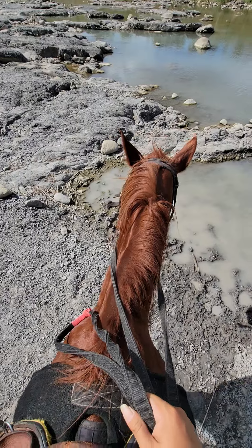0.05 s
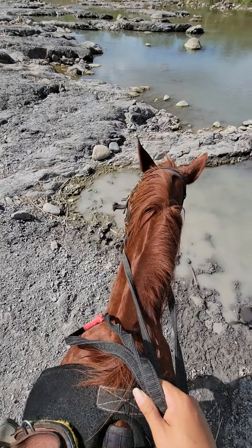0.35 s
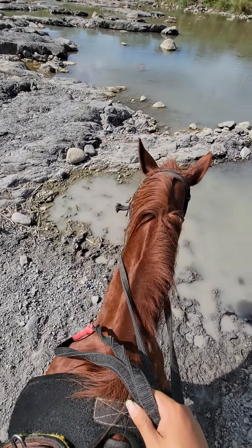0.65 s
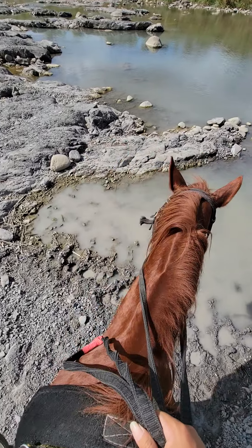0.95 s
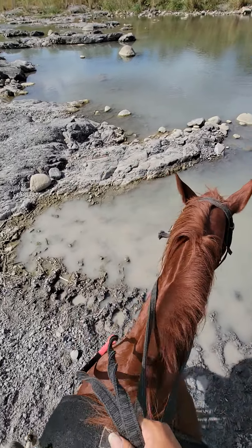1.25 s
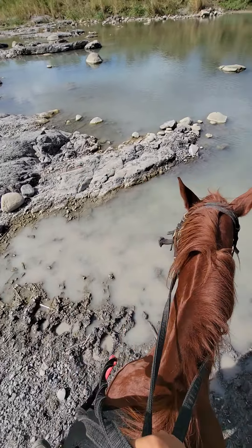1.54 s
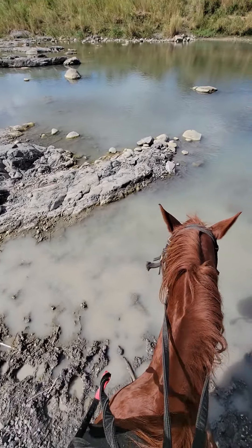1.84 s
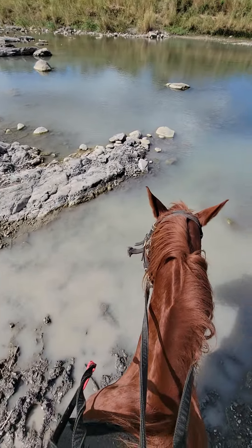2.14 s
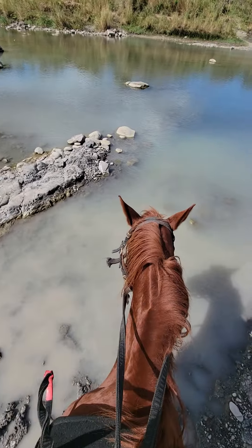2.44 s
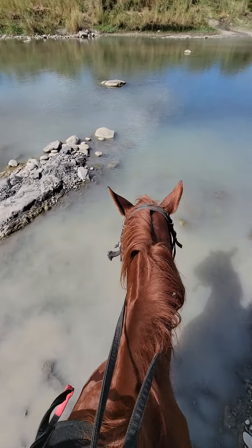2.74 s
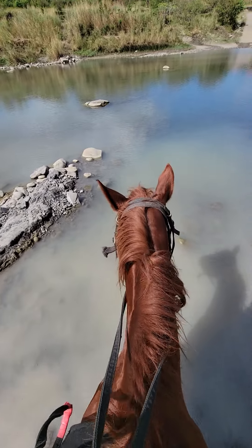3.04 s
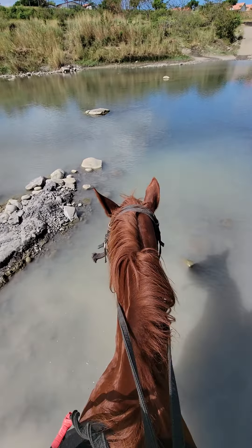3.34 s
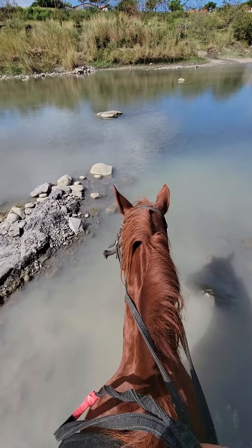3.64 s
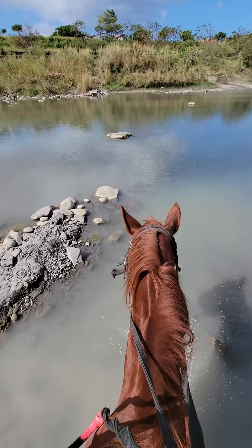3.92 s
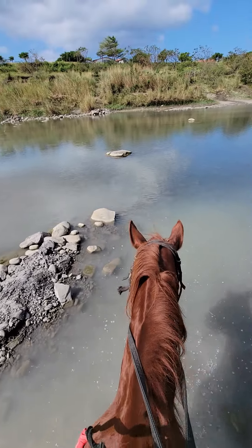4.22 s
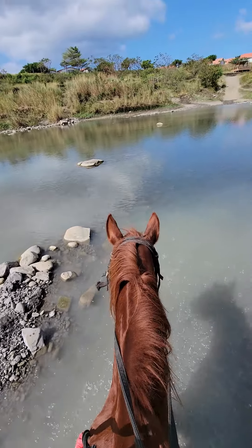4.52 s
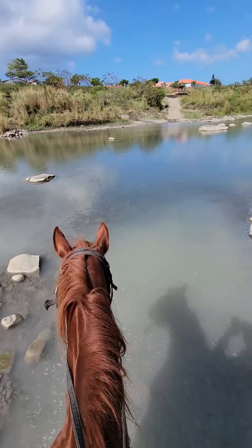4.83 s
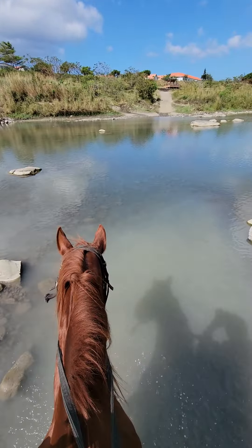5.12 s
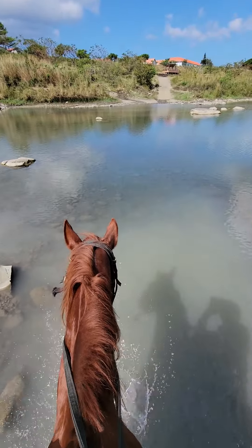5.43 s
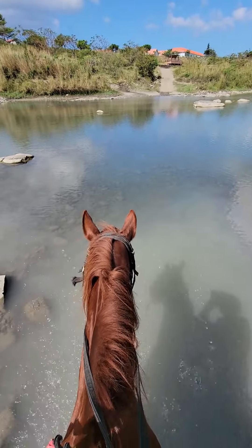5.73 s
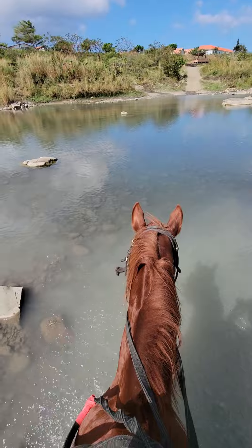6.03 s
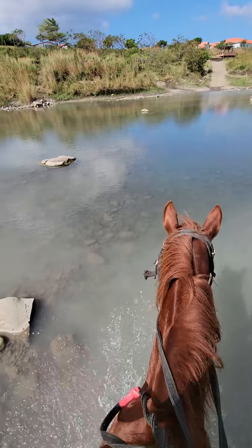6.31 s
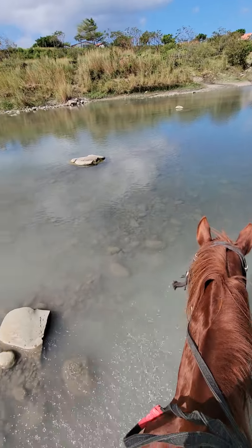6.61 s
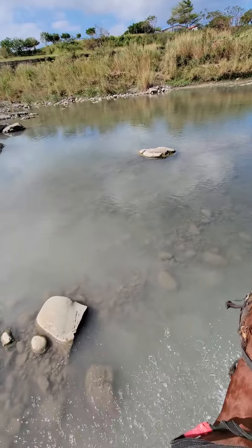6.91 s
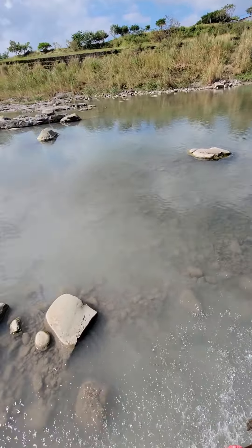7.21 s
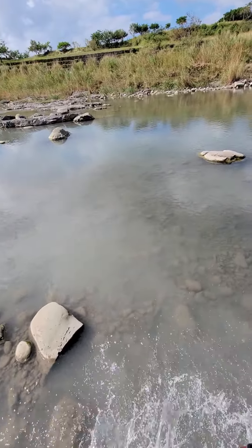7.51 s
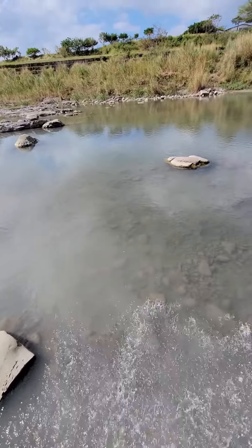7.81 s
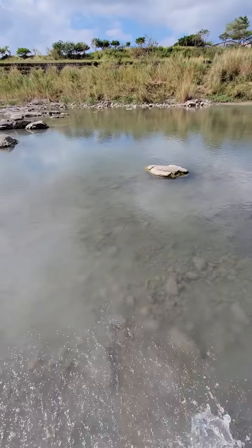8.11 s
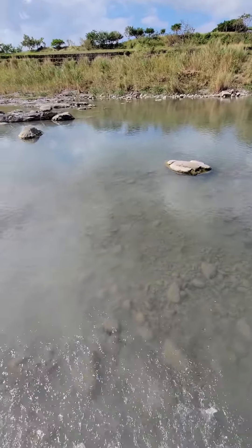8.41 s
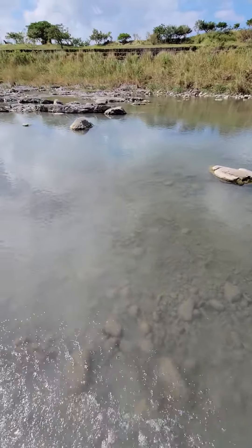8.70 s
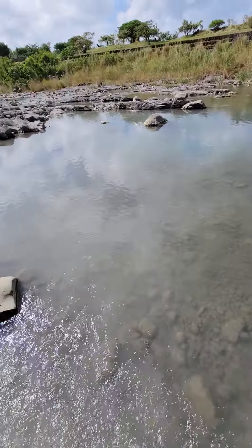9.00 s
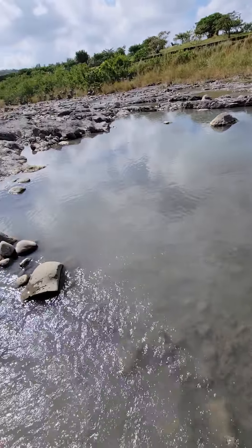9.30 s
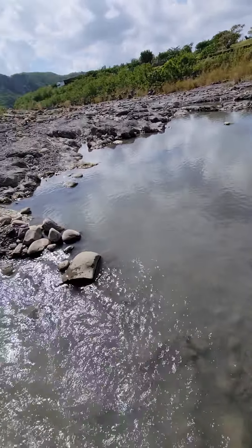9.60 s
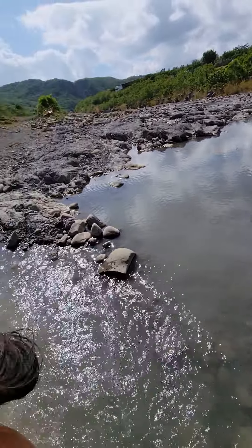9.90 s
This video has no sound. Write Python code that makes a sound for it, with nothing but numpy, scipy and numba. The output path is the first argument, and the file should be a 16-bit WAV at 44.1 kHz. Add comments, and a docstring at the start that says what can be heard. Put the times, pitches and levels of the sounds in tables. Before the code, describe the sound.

A horse steps over gravel and stones, then wades through a shallow river with repeated splashes and sloshing, as birds chirp faintly.

```python
"""A horse wades into a shallow river from a gravel bank, heard from a phone in the saddle.
Each hoof punches an air pocket that collapses into ringing bubbles; the legs churn the water and throw
spray that rains back. Every bubble is a damped resonator: the smaller it is, the higher its pitch.
Songbirds call from the far bank over faint insects, a low distant drone and a little wind."""
import sys
import numpy as np
from scipy import signal
from scipy.fft import rfft, irfft, next_fast_len
from scipy.io import wavfile
from scipy.ndimage import uniform_filter1d, map_coordinates
from numba import njit

SR = 44100
rng = np.random.default_rng(int(sys.argv[2]) if len(sys.argv) > 2 else 0)


def to_wav(s):
    """Save 16-bit WAV."""
    ch = np.atleast_2d(s).T  # columns
    pcm = np.round(np.clip(ch, -1, 1) * 32767)  # PCM
    wavfile.write(sys.argv[1], SR, pcm.astype(np.int16))


N = 438794
T = np.arange(N) / SR


def undb(db):
    """Decibels to amplitude gain."""
    return 10 ** (np.asarray(db) / 20)


def curve(rows, column=1):
    """Linear interpolation of one column of a time table, at every sample."""
    rows = np.array(rows)
    return np.interp(T, rows[:, 0], rows[:, column])


def colour(x, points, delayed=False):
    """Spectral shaping by (Hz, dB) points; if delayed, a third column gives the lag in ms."""
    size = next_fast_len(x.shape[-1] + 512)
    hz, points = np.fft.rfftfreq(size, 1 / SR), np.array(points)
    read = lambda column: np.interp(np.log(hz + 1), np.log(points[:, 0]), points[:, column])
    gain = undb(read(1))
    if delayed:
        gain = gain * np.exp(-2j * np.pi * hz * read(2) / 1000)
    return irfft(rfft(x, size) * gain, size)[..., :x.shape[-1]]


def unit(x):
    """Normalisation to rms 1."""
    return x / np.sqrt(np.mean(x ** 2))


def walk(rate_hz):
    """Smooth random modulation with a spread near 1."""
    knots = rng.standard_normal(4096)
    return np.interp(T * rate_hz, np.arange(len(knots)), knots)


def add(out, s, x, db):
    """Superposition: mix in a short sound at time s with the given peak level."""
    i = int(s * SR)
    out[:, i:i + x.shape[1]] += x[:, :N - i] * undb(db) / np.abs(x).max()


def swells(bed_db, rows, rise_share=.34, roundness=2.2):
    """Incoherent sources add in power: the level in dB of a bed plus swells (peak s, length s, dB)."""
    t = T[::64]
    power = undb(bed_db + 0 * T)[::64] ** 2
    for s, length_s, db in rows:
        away = np.maximum((s - t) / rise_share, (t - s) / (1 - rise_share)) / length_s
        power = power + undb(db - 10 * np.minimum(away, 10) ** roundness) ** 2  # ends 10 dB down
    return np.interp(T, t, 10 * np.log10(power))


def diffuse_noise(shared_hz):
    """In a diffuse field the phone's two ports share long waves and differ in short ones."""
    mid, side = rng.standard_normal((2, N))
    side = signal.sosfilt(signal.butter(2, shared_hz, "high", fs=SR, output="sos"), side)
    return np.array([mid + side, mid - side])


@njit
def ring(start, hz, t60, peak, glide, lag, size):
    """Damped oscillators that can glide upward, each with its own lag between the ports."""
    out = np.zeros((2, size))
    for k in range(len(start)):
        for side in range(2):
            onset = max(start[k] + (side - .5) * lag[k], 0.)
            for i in range(int(onset * SR) + 1, min(int((onset + t60[k]) * SR), size)):
                age = i / SR - onset
                phase = 2 * np.pi * hz[k] * age * (1 + .35 * glide[k] * age)
                out[side, i] += peak[k] * np.exp(-6.9 * age / t60[k]) * np.sin(phase)
    return out


def grains(count, low_hz, high_hz, cycles, spread_db, lag_s, rise=.97):
    """Shot noise of ringing grains; by a power law, a few are much larger than the rest."""
    when, pitch, rank, life, place = rng.random((count, 5)).T
    hz = low_hz * (high_hz / low_hz) ** pitch
    t60 = cycles * (.4 + 1.2 * life) / hz
    peak = undb(-spread_db * np.log(rank + .01)) * hz * (-1) ** np.arange(count)
    return unit(ring(when * N / SR, hz, t60, peak, rise / t60, lag_s * (2 * place - 1), N))


def burst(count, hz, octaves, cycles, fade_s, lag_s=8e-5):
    """A transient of ringing grains around one pitch, dying away over four times fade_s."""
    pitch, strength, polarity = rng.standard_normal((count, 3)).T
    age = np.arange(count) / count
    hz = np.minimum(hz * 2 ** (octaves * pitch), SR / 2)
    start = 4 * fade_s * (age + rng.random(count) * (age > 0) / count)
    peak = np.exp(-3.5 * age) * undb(5.26 * strength) * np.sign(polarity)
    return ring(start, hz, cycles / hz, peak, 0 * hz, lag_s * rng.standard_normal(count), SR // 5)


# Spectrum of the open air. Each row: frequency in Hz, gain in dB.
AIR_SPECTRUM = [(25, -17), (55, -4), (110, 13), (170, 2), (350, -2.5), (900, -6.5), (2000, -14),
                (3000, -10.5), (4500, -20.5), (8000, -31.5), (11000, -45.5), (16000, -35)]
def open_air(air_db=-50, drone_hz=84, drone_db=-48):
    """Diffuse ambient noise and a distant drone that wavers by random modulation."""
    air = unit(colour(diffuse_noise(260), AIR_SPECTRUM)) * undb(air_db + walk(4.25) + 2.08 * walk(6))
    drone = np.sin(2 * np.pi * np.cumsum(drone_hz + 2.675 * walk(4.6)) / SR)
    return air + unit(drone) * undb(drone_db + 2 * walk(20))


# Wind on the phone. Each row: time in seconds, level in dB.
WIND_LEVELS = [(0, -42), (.3, -40.5), (.39, -29), (.48, -36.5), (.8, -48), (1.3, -54.5), (6, -63),
               (9.95, -55.5)]
def wind():
    """Turbulence buffets the phone with low-frequency pressure fluctuations."""
    spectrum = [(15, -22), (35, 1.5), (70, 2.5), (120, -11), (250, -29), (1000, -36.5), (4000, -91)]
    return unit(colour(diffuse_noise(33), spectrum)) * undb(curve(WIND_LEVELS) + 2 * walk(25))


# Insect buzzes. Each row: start in seconds, length in seconds, pitch in Hz, level in dB.
INSECT_BUZZES = [(0.054, 0.16, 10900, -64), (1.57, 0.13, 10500, -67), (1.724, 0.11, 10500, -61)]
def insects():
    """Random frequency modulation roughens a very high tone into a thin buzz."""
    out = np.zeros((2, N))
    for s, length_s, hz, db in INSECT_BUZZES:
        size = int(length_s * SR)
        wander = uniform_filter1d(rng.standard_normal((2, size)), 40, axis=1)
        phase = 2 * np.pi * np.cumsum(hz + 1800 * wander, axis=1) / SR
        add(out, s, np.sin(phase) * np.hanning(size), db)
    return out


def chirp(length_s, hz, fall_octaves, fall_s=.058, burr_hz=420, burr_octaves=.075, break_hz=150):
    """A falling whistle, made ragged by fast frequency and amplitude modulation."""
    age = T[:int(length_s * SR)]
    flutter = np.interp(age * burr_hz, np.arange(256), rng.standard_normal(256))
    breaks = np.interp(age * break_hz, np.arange(256), rng.standard_normal(256))
    pitch = hz * 2 ** (burr_octaves * flutter - fall_octaves * np.tanh((age / fall_s) ** 2))
    envelope = np.hanning(len(age)) ** .5 * (1 + np.tanh(breaks))
    return np.sin(2 * np.pi * np.cumsum(pitch) / SR)[None] * envelope


def chorus(count, hz, db):
    """Random rows of chirps from birds further off, attenuated by distance."""
    when, length, distance, pitch = rng.random((count, 4)).T
    pitches = hz * 2 ** (.6 * (pitch - .5))
    return list(zip(when * (N / SR - .2), .025 + .04 * length, db - 10 * distance, pitches))


# Songbird chirps. Each row: start in seconds, length in seconds, level in dB, starting pitch in Hz.
BIRD_CHIRPS = [(0.1, 0.019, -34.5, 3074), (0.175, 0.038, -46, 2800), (0.232, 0.089, -48, 3120),
               (0.455, 0.02, -48, 2450), (1.03, 0.023, -56, 3200), (1.1, 0.084, -58, 6300),
               (1.22, .04, -51, 2850), (1.39, 0.034, -35.5, 3340), (1.495, 0.054, -36, 3290),
               (1.62, 0.045, -37.5, 3880), (1.688, 0.054, -36, 3280), (1.755, .045, -40, 2720),
               (1.788, 0.09, -40, 3870), (1.88, 0.065, -40.5, 3000), (1.942, .028, -39, 2620),
               (2.485, 0.033, -45.5, 2900), (2.67, 0.036, -44, 3400), (2.78, .075, -37, 3580),
               (2.935, 0.1, -39, 3480), (3.248, 0.026, -35.5, 2920), (3.465, .055, -37, 3314),
               (3.567, 0.039, -37, 3270), (3.638, 0.032, -33, 3350), (3.705, 0.028, -41, 2634),
               (4.755, 0.031, -45, 2940), (4.945, 0.036, -40, 2920), (5.805, 0.025, -36, 3360),
               (5.972, 0.039, -37, 3350), (6.15, 0.041, -37.5, 3330), (6.815, 0.033, -38.5, 2820),
               (8.15, 0.039, -39, 2960)]
def birds(reverb_s=.24, direct_db=-3):
    """Reverberation from the bank blurs the chirps with an exponentially decaying tail."""
    song = np.zeros((2, N))
    for s, length_s, db, hz in list(BIRD_CHIRPS) + chorus(count=190, hz=2950, db=-45.5):
        add(song, s, chirp(length_s, hz, fall_octaves=.5 * rng.uniform(.45, 1.15)), db - 1)
    tail = rng.standard_normal((2, SR // 2)) * undb(-60 * T[:SR // 2] / reverb_s)
    tail /= np.sqrt(np.sum(tail ** 2, axis=1, keepdims=True))
    return undb(direct_db) * song + signal.fftconvolve(song, tail, axes=1)[:, :N]


# Spectrum of the gravel. Each row: frequency in Hz, gain in dB.
GRAVEL_SPECTRUM = [(120, -8), (350, 10.5), (900, 9), (1600, 7.5), (2150, 5.5), (2700, 0.5), (4200, 3.5),
                   (6000, -4.5), (8000, -7.5), (10500, -21), (16000, -13)]
# A hoof grinds the gravel. Each row: peak time in seconds, length in seconds, level in dB.
HOOF_SCUFFS = [(0.322, 0.079, -55), (0.709, 0.054, -53), (1.44, 0.16, -48.5), (2.29, 0.056, -45),
               (2.423, 0.01, -45.5), (2.52, 0.021, -58), (2.95, 0.41, -55), (3.065, 0.031, -38)]
def gravel(bed_db=-64):
    """Granular friction: grit shifts under the horse's weight in many heavily damped impacts."""
    grit = grains(count=9000, low_hz=235, high_hz=14000, cycles=1.9, spread_db=1.6, lag_s=2.48e-4)
    return unit(colour(grit, GRAVEL_SPECTRUM)) * undb(swells(bed_db, HOOF_SCUFFS) + 7)


# Stones knocked by the hooves. Each row: start in seconds, level in dB, pitch in Hz.
STONE_KNOCKS = [(0.372, -27, 3980), (0.422, -28.5, 1800), (0.643, -25.5, 1130), (0.678, -32.5, 3820),
                (0.898, -26.5, 2000), (0.93, -40.5, 5000), (2.293, -28.5, 2200), (2.52, -28.5, 1660),
                (3.06, -23, 2220), (3.131, -20, 1740)]
def stones():
    """Impact excitation: the smaller the stone, the higher its click; the grit around it dulls it."""
    out = np.zeros((2, N))
    for s, db, hz in STONE_KNOCKS:
        click = burst(count=20, hz=hz, octaves=1, cycles=3, fade_s=.0024)
        add(out, s + .00141, colour(click, GRAVEL_SPECTRUM), db + 3)
    return out


# Spectrum of churned water. Each row: frequency in Hz, gain in dB.
CHURN_SPECTRUM = [(90, 5.5), (150, -5), (350, 2), (600, 2), (1000, -4), (1500, -18), (2500, -52),
                  (5000, -43)]
def churn(bubbles_db=-1, glugs_db=-6):
    """Air entrainment: the legs stir in large bubbles that resonate at low pitches."""
    bubbles = grains(count=7500, low_hz=95, high_hz=2000, cycles=17, spread_db=1.8, lag_s=2.2e-4)
    glugs = grains(count=260, low_hz=260, high_hz=950, cycles=30, spread_db=2.1, lag_s=1e-4, rise=.5)
    slosh = undb(bubbles_db) * unit(colour(bubbles, CHURN_SPECTRUM))
    slosh += undb(glugs_db) * unit(colour(glugs, CHURN_SPECTRUM))
    return colour(slosh, [(40, -22), (120, -3)])


# Spectrum of trickling water. Each row: frequency in Hz, gain in dB.
TRICKLE_SPECTRUM = [(500, 6), (1000, 8.5), (1400, 6), (2000, 4), (2600, -11), (3500, -11), (7000, -33)]
def trickle():
    """Water running off the legs traps small bubbles, which resonate higher."""
    bubbles = grains(count=24000, low_hz=847, high_hz=4020, cycles=40, spread_db=2.1, lag_s=8e-5)
    return unit(colour(bubbles, TRICKLE_SPECTRUM))


# Spectra of falling drops and of fine mist. Each row: frequency in Hz, gain in dB.
DROP_SPECTRUM = [(1000, 5), (2200, -3), (3000, -0.5), (4100, -2.5), (5200, -8), (7500, -11), (10000, -20),
                 (16000, -35)]
MIST_SPECTRUM = [(3000, -7), (6000, -3.5), (8000, -6), (10500, -12.5), (13000, -6.5), (16000, -8)]
def spray(level_db, mist_growth=1.44):
    """Drop impact: thrown water patters back as short ticks, longer pings and a hiss of mist."""
    ticks = grains(count=50000, low_hz=1660, high_hz=10600, cycles=5.2, spread_db=1, lag_s=1.8e-4)
    pings = grains(count=2600, low_hz=2600, high_hz=11000, cycles=70, spread_db=2.5, lag_s=2e-4, rise=.1)
    mist = grains(count=40000, low_hz=6100, high_hz=17500, cycles=2.7, spread_db=1.5, lag_s=1.49e-4)
    drops = unit(colour(ticks + undb(-4.5) * pings, DROP_SPECTRUM)) * undb(level_db + 7)
    # the harder the water is thrown, the larger the share of the finest droplets
    mist_db = mist_growth * (level_db + 47) - 47.5
    return drops + unit(colour(mist, MIST_SPECTRUM)) * undb(mist_db)


def clumping(x, depth_db, rate_hz, band_hz):
    """Bubbles of like size come in clumps, so each narrow band has its own random modulation."""
    hz, t, bands = signal.stft(x, SR, nperseg=1024)
    place = np.meshgrid(np.sqrt(hz / band_hz), t * rate_hz, indexing="ij")
    chance = map_coordinates(rng.standard_normal((256, 256)), place, mode="mirror")
    return signal.istft(bands * undb(depth_db * chance), SR)[1][:, :N]


# The wake grows as the horse gets deeper. Each row: time in seconds, churn, trickle and spray in dB.
WAKE_LEVELS = [(3.35, -46, -74, -69), (3.8, -40, -53.5, -57.5), (5.2, -60.5, -49, -57),
               (6.2, -40, -51, -56.5), (7.4, -35.5, -45, -46), (8.7, -32.5, -43.5, -49.5),
               (9.45, -39.5, -41, -49.5), (9.95, -31, -44.5, -55)]
# A leg drags through the water. Each row: peak time and length in seconds, churn and trickle in dB.
LEG_SWEEPS = [(3.462, 0.12, -46, -45.5), (3.6, 0.077, -36.5, -39.5), (4.224, 0.2, -36, -40.5),
              (4.393, 0.32, -32.5, -47), (4.598, 0.033, -26.5, -28.5), (4.883, 0.45, -36, -70),
              (5.124, 0.078, -30.5, -44), (5.37, 0.12, -35.5, -50), (5.538, 0.12, -26, -61),
              (5.814, 0.35, -35, -65), (5.906, 0.17, -30, -37), (6.054, 0.15, -35.5, -42),
              (6.392, 0.075, -30, -37), (6.656, 0.28, -27.5, -35.5), (6.872, 0.076, -55, -37),
              (7.435, 0.17, -28, -34), (7.615, 0.22, -28.5, -35), (7.898, 0.13, -24, -35),
              (8.3, 0.33, -26, -41), (8.465, 0.11, -25.5, -52), (8.73, 0.18, -25, -60),
              (9.17, 0.14, -29, -34.5)]
# Thrown water rains back. Each row: peak time in seconds, length in seconds, level in dB.
SPRAY_SHOWERS = [(3.56, 0.037, -51.5), (3.894, 0.044, -46.5), (3.985, 0.027, -45.5), (4.283, 0.21, -51.5),
                 (4.52, 0.32, -48.5), (4.729, 0.016, -46), (5.308, 0.18, -48.5), (5.453, 0.17, -47.5),
                 (5.763, 0.74, -53.5), (6.358, 0.6, -45.5), (6.602, 0.19, -46.5), (7.09, 0.34, -45),
                 (7.82, 0.42, -43), (7.913, 0.11, -40), (8.323, 0.19, -42), (8.96, 0.12, -50),
                 (9.406, 0.15, -42)]
def wading(wash_s=.087):
    """Power summation of the wake, leg sweeps, showers and the wash closing over each hoof."""
    churn_swells = [(s, length_s, db) for s, length_s, db, _ in LEG_SWEEPS]
    churn_swells += [(s, wash_s, db - 23) for s, db, *_ in HOOF_PLUNGES]
    trickle_swells = [(s, length_s, db) for s, length_s, _, db in LEG_SWEEPS]
    trickle_swells += [(s, wash_s, db - 33) for s, db, *_ in HOOF_PLUNGES]
    churn_db = swells(curve(WAKE_LEVELS, 1), churn_swells)
    trickle_db = swells(curve(WAKE_LEVELS, 2), trickle_swells) + 2
    spray_db = swells(curve(WAKE_LEVELS, 3), SPRAY_SHOWERS) + 1.8 * walk(45)  # it lands unevenly
    water = churn() * undb(churn_db) + trickle() * undb(trickle_db) + spray(spray_db)
    return clumping(water, depth_db=1.7, rate_hz=24, band_hz=6)


# Hollows behind a leg. Each row: start and length in seconds, first and last pitch in Hz, level in dB.
LEG_HOLLOWS = [(3.363, 0.082, 161, 367, -40.5), (3.645, 0.072, 439, 276, -37.5),
               (3.723, 0.12, 116.6, 389, -31)]
def slurps():
    """Cavity resonance: the air in a hollow slides in pitch as the hollow opens or closes."""
    out = np.zeros((2, N))
    waver = undb(2.5 * walk(86))
    for s, length_s, start_hz, end_hz, db in LEG_HOLLOWS:
        age = np.linspace(0, 1, int(length_s * SR))
        tone = np.sin(2 * np.pi * np.cumsum(start_hz * (end_hz / start_hz) ** age) / SR)
        add(out, s, tone[None] * np.sqrt(age * (1 - age)), db)
    return out * waver


# Lumps of thrown water land. Each row: start in seconds, level in dB, bubble pitch in Hz.
WATER_LUMPS = [(3.885, -36, 7500), (3.902, -40, 8700), (3.94, -26.5, 4300), (3.968, -21, 4230),
               (3.98, -42, 13100), (4.067, -33, 4740), (5.407, -17.5, 4480), (5.45, -28, 5000),
               (5.609, -27, 3820), (6.125, -36, 4250), (6.373, -20, 4250), (7.334, -19, 3800),
               (7.728, -29, 5940), (7.835, -13.5, 5000), (8.456, -31.5, 4200), (8.569, -27.5, 9900),
               (9.397, -24.5, 5070)]
def splats(crackle_db=-6):
    """Each impact excites a bubble resonance near one pitch inside a crackle of finer bubbles."""
    out = np.zeros((2, N))
    for s, db, hz in WATER_LUMPS:
        add(out, s, burst(count=5, hz=hz, octaves=.1, cycles=45, fade_s=.002), db)
        add(out, s, burst(count=30, hz=hz, octaves=.6, cycles=8, fade_s=.004), db + crackle_db)
    return out


# Single air pockets. Each row: start in seconds, pitch in Hz, level in dB, glide in octaves per second.
AIR_POCKETS = [(3.158, 384, -15, 0), (3.198, 1120, -22, -11), (3.46, 556, -25, 5), (3.962, 863, -1.5, -13),
               (3.984, 80.4, -16.5, 3), (4.843, 171, -24.5, 12), (4.866, 175, -21.5, -3.5),
               (4.917, 200, -31, 5), (4.97, 380, -21.5, 13), (5.03, 294, -12, 0), (5.408, 2030, -14, 10),
               (5.466, 448, -6, -6.5), (5.606, 954, -20, 4), (5.947, 312, -16.5, 9),
               (5.986, 317, -21.5, -7), (6.099, 370, -26, 1), (6.317, 800, -7, 30), (6.329, 170, -22.5, 6),
               (6.798, 65.5, -24.5, 3.5), (6.998, 810, -8, -3), (7.014, 813, -4.5, -4),
               (8.34, 170, -30, -9), (8.765, 128, -24, -8), (8.942, 850, -18, 6), (9.678, 336, -28, -1)]
def gulps(swell_s=.0061, cycles=19, longest_s=.2):
    """Damped resonance: larger pockets ring lower and longer, unless they burst at the surface first."""
    out, age = np.zeros((2, N)), T[:SR // 3]
    for s, hz, db, glide in AIR_POCKETS:
        t60 = min(cycles / hz, longest_s)
        phase = 2 * np.pi * np.cumsum(hz * 2 ** (glide * age)) / SR
        add(out, s, np.sin(phase)[None] * undb(-60 * age / t60) * np.tanh(age / swell_s), db)
    return out


# Spectrum of a hoof's slap. Each row: frequency in Hz, gain in dB.
SLAP_SPECTRUM = [(150, -33), (400, -43), (1000, 23), (1900, 22), (2700, -8.5), (4200, 15), (6000, -12),
                 (10000, -41), (16000, -49)]
def slap():
    """The brief impact of a hoof on the surface radiates a broadband transient."""
    impact = burst(count=28, hz=1940, octaves=.92, cycles=14, fade_s=.0032, lag_s=3e-5)
    return colour(impact, SLAP_SPECTRUM)


# Hooves strike the river. Each row: start in seconds, level in dB, nominal pocket pitch in Hz,
# relative slap level in dB.
HOOF_PLUNGES = [(3.155, -12.5, 382, -11), (3.217, -16, 213, -35), (3.557, -18, 230, -23),
                (3.9, -12.5, 314, -7.5), (3.928, -21, 710, -22), (3.939, -9, 570, -13),
                (3.963, -14.5, 514, -14), (3.971, -2.5, 435, -21), (3.986, -15, 450, -14),
                (4.007, -21, 694, 7.5), (4.341, -18, 463, -30), (4.36, -19, 352, -17),
                (4.422, -17, 520, -35), (4.654, -5.5, 426, -1.5), (4.702, -12, 415, -17),
                (4.724, -16, 384, -3), (5.007, -13, 300, -21), (5.027, -1.5, 314, -10.5),
                (5.406, -17, 470, -3), (5.415, -22, 426, -3), (5.458, -4, 342, -6.5), (5.919, -13, 446, -1),
                (6.038, -20.5, 540, -14), (6.313, -2, 365, -27), (6.712, -2.5, 309, -15.5),
                (6.728, -10, 430, -31), (6.751, -10, 400, -27), (6.985, -8, 296, -11),
                (6.998, -10.5, 377, -12), (7.013, -2, 360, -29), (7.883, -5.5, 337, -26),
                (7.905, -15, 324, -3), (8.258, -20, 370, -11), (8.349, -22, 396, -3.5),
                (8.705, -19, 316, -37), (8.77, -21.5, 400, -31), (9.675, -13.5, 328, -42),
                (9.843, -19.5, 335, -30)]
def plunges(ring_cycles=11, swell_cycles=.45, pocket_rise=.42, closing_s=.001615, collapse_s=.005):
    """Cavity collapse: a hoof slaps in an air pocket that rings upward, shatters and boils on."""
    bubbles, slaps = np.zeros((2, 2, N))
    for s, db, hz, slap_db in HOOF_PLUNGES:
        turns = T[:SR // 5] * hz
        age = turns / ring_cycles  # in ring times of this pocket
        envelope = (1 - np.exp(-(turns / swell_cycles) ** 2)) * undb(-60 * age)
        pocket = np.sin(2 * np.pi * turns * (.85 + pocket_rise * age))[None] * envelope
        cloud = burst(count=14, hz=700 * np.sqrt(hz / 400), octaves=.55, cycles=14, fade_s=collapse_s)
        boil = burst(count=12, hz=hz, octaves=.3, cycles=20, fade_s=.018)
        add(bubbles, s, pocket, db + 4)
        add(bubbles, s + closing_s, cloud, db + .23 * slap_db)  # a harder slap shatters more air
        add(bubbles, s + 2 * collapse_s, boil, db - 13)
        add(slaps, s + closing_s, slap(), db + slap_db + 4)
    # small pockets radiate almost no bass, and the water above them rounds off their attack
    radiation = [(50, -31), (120, -3.5), (220, -6.5), (450, -3), (1100, 6.5), (1700, 5.5),
                 (3000, -17), (8000, -27)]
    return colour(bubbles, radiation) + slaps


# The left port faces away from the water. Each row: frequency in Hz, gain in dB, lag in milliseconds.
PORT_SHADOW = [(90, -2.5, 0), (200, -5.5, .3), (400, -8.5, .5), (700, -6, .51), (1200, -1, .36),
               (2000, -1.5, .34), (4400, -4, .3), (8000, -1, .3)]
# The balance shifts as the horse turns. Each row: time in seconds, left minus right in dB.
STEP_BALANCE = [(2.8, 4), (3.15, -1.5), (3.95, -0.5), (4.3, 0.5)]
def from_below(x):
    """Acoustic shadowing: sound from below reaches the left port late and weakened."""
    ports = np.array([colour(x[0], PORT_SHADOW, delayed=True), x[1]])
    return ports * undb(np.outer([.5, -.5], curve(STEP_BALANCE)))


def scene(entry_s=2.95, crossfade_s=.17):
    """Superposition of the steps, passing from gravel to water, and the background."""
    wet = np.clip((T - entry_s) / crossfade_s, 0, 1)
    bank = (1 - wet ** 2) * gravel() + stones()
    river = wet * wading() + plunges() + splats() + gulps() + slurps()
    background = open_air() + wind() + birds() + insects()
    return from_below(bank + river) + background * undb([[-2], [.5]])


def record(dry, opens_s=.104, top_hz=15900):
    """Saturation and band limiting: the phone opens after a moment, rounds peaks and cuts the top."""
    rounded = np.tanh(dry * (T > opens_s))
    return signal.sosfilt(signal.ellip(10, .2, 70, top_hz, fs=SR, output="sos"), rounded)


dry = scene()
out = record(dry)
to_wav(out)
```